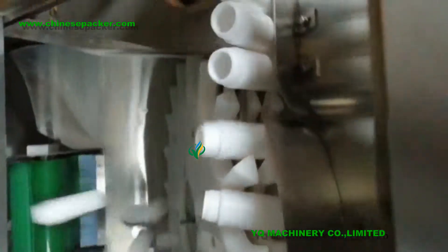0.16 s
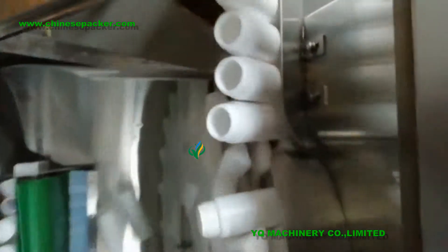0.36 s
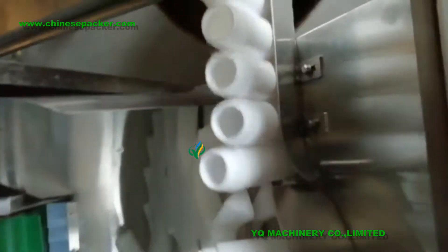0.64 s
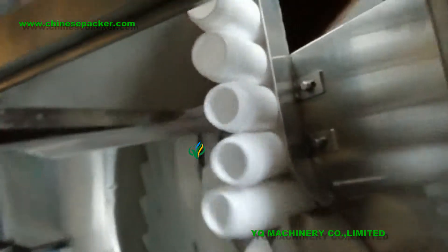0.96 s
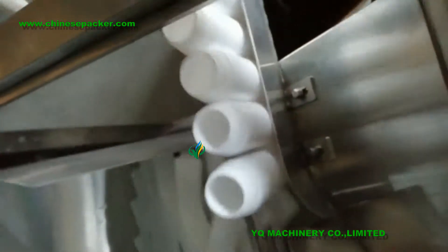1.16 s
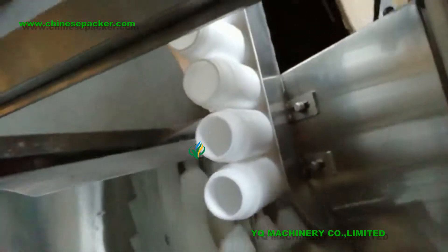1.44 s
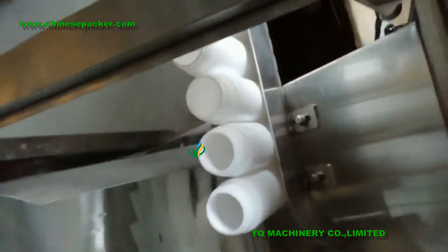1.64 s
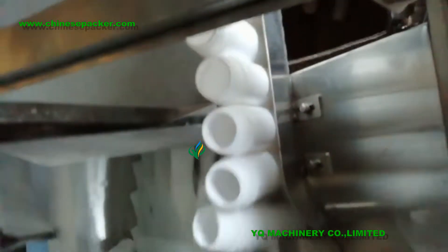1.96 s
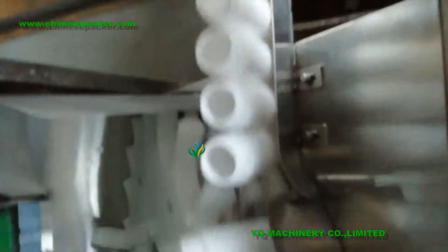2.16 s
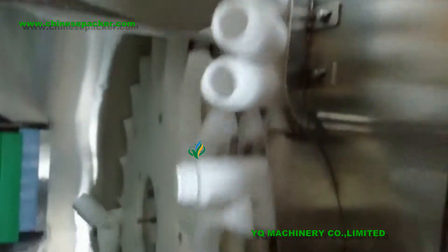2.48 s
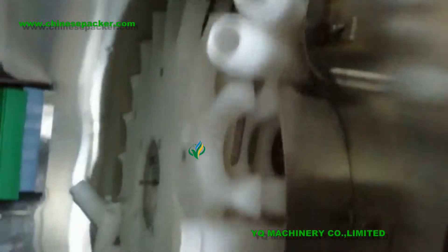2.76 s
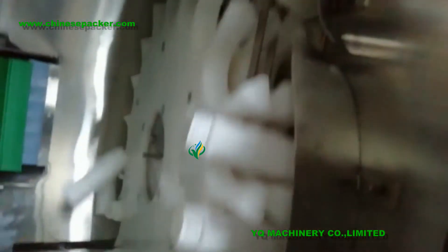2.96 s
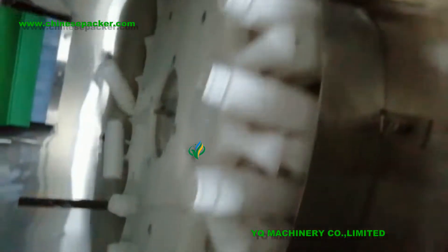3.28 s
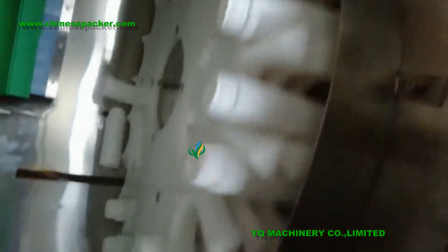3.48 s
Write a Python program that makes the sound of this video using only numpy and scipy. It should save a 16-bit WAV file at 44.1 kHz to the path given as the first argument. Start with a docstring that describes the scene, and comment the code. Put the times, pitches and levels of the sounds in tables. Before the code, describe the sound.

A bottle sorting machine runs continuously: air jets hiss in uneven surges while empty plastic bottles rattle, knock on metal guides and drop with hollow thumps, heard close above the steel bowl in a factory.

```python
"""A rotary bottle sorter runs in a factory, heard from close above its steel bowl.
From the start, air jets hiss and surge as bottles pass the nozzles: filtered noise with quick echoes and chatter.
Empty bottles rattle over the low rumble of the turning bowl: random contacts drive noise bands and resonances.
Soon bottles knock on the guides and drop with hollow thumps: decaying modes, echoed between steel walls.
Later come flat slaps, single swings of pressure, and a low drone that swells briefly, a wavering sine."""
import sys
import numpy as np
from scipy import signal
from scipy.io import wavfile

SR = 44100
rng = np.random.default_rng(int(sys.argv[2]) if len(sys.argv) > 2 else 0)


def generate_wav(sig):
    """Save sig (samples, or channels by samples) to the path in sys.argv[1] as 16-bit PCM at SR."""
    pcm = np.round(np.clip(np.atleast_2d(sig).T, -1, 1) * 32767).astype(np.int16)
    wavfile.write(sys.argv[1], SR, pcm)


N = 159642
T = np.arange(N) / SR  # time, s
BLOW_SAMPLES = SR // 4  # length computed for each blow
SIDES = np.array([[1], [-1]])  # opposite signs for left and right
# stereo balance of noise and thumps: f/Hz, left minus right/dB
BALANCE = [(60, -6), (200, 2.5), (330, -3), (500, 6.5), (770, 10), (1170, 1), (1790, -4), (2740, 0),
           (4200, -2), (7000, -2.5), (8500, -1.5), (10500, 0), (15000, -1)]


def from_db(db):
    """Logarithmic level: decibels to amplitude gain."""
    return 10 ** (np.asarray(db) / 20)


def rms_one(x):
    """Normalisation of power: scale to unit rms."""
    return x / np.sqrt(np.mean(x ** 2) + 1e-20)


def in_time(rows):
    """Linear interpolation: each column of a time table at every sample."""
    s, *columns = np.transpose(rows)
    return [np.interp(T, s, column) for column in columns]


def at_hz(points, hz):
    """Interpolation on a logarithmic frequency axis."""
    table_hz, values = np.transpose(points)
    return np.interp(np.log(hz), np.log(table_hz), values)


def panned(db):
    """Interaural level difference: left and right gains of constant total power."""
    return rms_one(from_db(SIDES / 2 * db))


def drift(rate_hz):
    """Low-pass random process: critically damped filtered noise, of spread 1."""
    step = 40  # computed at every 40th sample
    warm_up = 2000
    pole = np.exp(-2 * np.pi * rate_hz * step / SR)
    noise = rng.standard_normal(N // step + 2 + warm_up)
    slow = signal.lfilter([1], [1, -2 * pole, pole * pole], noise)[warm_up:]
    return np.interp(np.arange(N) / step, np.arange(len(slow)), rms_one(slow))


def add(out, s, sound):
    """Superposition: mix a short stereo sound in at a time."""
    i = int(max(s, 0) * SR)
    out[:, i:i + sound.shape[1]] += sound[:, :max(N - i, 0)]


def coloured(spectrum, drive, patchy_db, flicker_hz):
    """Third-octave noise synthesis: partly coherent stereo bands share a drive but flicker singly; rms 1."""
    # coherence between the ears: f/Hz, left-right likeness (clipped to -1..1)
    likeness = [(60, 1), (200, 0.91), (330, 0.79), (500, -1.04), (770, -0.21), (1170, 0.78), (1790, 0.49),
                (2740, -0.28), (4190, -0.21), (6400, -0.088), (15000, -0.061)]
    out = 0
    edges = 25 * 2 ** (np.arange(29) / 3)
    white = rng.standard_normal((2, 2, N)) * drive  # neighbouring bands use different noise
    for k, (low, high) in enumerate(zip(edges, edges[1:])):
        if high < spectrum[0][0] or low > spectrum[-1][0]:
            continue
        hz = np.sqrt(low * high)
        band = signal.butter(2, [low, high], "band", fs=SR, output="sos")
        mid, side = signal.sosfilt(band, white[k % 2])
        alike = np.clip(at_hz(likeness, hz), -1, 1)
        level_db = at_hz(spectrum, hz) + patchy_db * drift(flicker_hz)
        stereo = np.sqrt(1 + alike) * mid + np.sqrt(1 - alike) * side * SIDES
        out = out + from_db(level_db) * panned(at_hz(BALANCE, hz)) * stereo
    return rms_one(out)


def near_walls(x):
    """Early reflection: steel sheets close to the nozzles return three quick echoes a side; rms 1."""
    echo_gain = 0.27
    out = x.copy()
    for k, lag in enumerate((rng.uniform(.001, .012, 6) * SR).astype(int)):
        out[k % 2, lag:] += echo_gain * x[k % 2, :-lag]
    return rms_one(out)


def chatter():
    """Impulse excitation: random light ticks ring briefly, mostly at a few of 20 high pitches; rms 1."""
    ticks_per_s, spread_db, t60_s = 170, 2.5, 0.031
    sizes = from_db(spread_db * np.minimum(rng.exponential(1, N), 3))
    ticks = (rng.random(N) < ticks_per_s / SR) * sizes
    at = np.flatnonzero(ticks)
    out = np.zeros((2, N))
    for hz in np.geomspace(2900, 6270, 20):
        hits = np.zeros((2, N))
        # the product of two random factors leaves few strong pitches in a tick
        hits[:, at] = ticks[at] * rng.exponential(1, len(at)) * rng.standard_normal((2, len(at)))
        pole = from_db(-60 / (t60_s * SR)) * np.exp(2j * np.pi * hz / SR)
        out += signal.lfilter([1], [1, -pole], hits + 1e-18).imag
    return rms_one(out)


def air_jets():
    """Turbulent jet noise: hiss and lower rush flutter together and sway; bottles chatter in the stream."""
    # jet strength: t/s, relative level of hiss/dB, relative level of rush/dB
    jet_levels = [(0.0, -20, -22.5), (0.08, -17.5, -38), (0.11, -16.5, -20), (0.12, -23, -41),
                  (0.13, -17.5, -27), (0.3, -18, -30.5), (0.31, -15, -17.5), (0.34, -24.5, -28.5),
                  (0.39, -25, -27), (0.42, -27.5, -39), (0.49, -22.5, -30), (0.55, -18, -18.5),
                  (0.57, -18, -30), (0.67, -17, -19), (0.73, -22, -29.5), (0.84, -18.5, -28),
                  (0.9, -19, -20.5), (0.94, -16.5, -27), (1.06, -21.5, -22.5), (1.09, -18, -26.5),
                  (1.19, -19, -22.5), (1.24, -17, -25.5), (1.32, -18, -28.5), (1.35, -16.5, -23),
                  (1.4, -23.5, -20.5), (1.445, -21, -27.5), (1.675, -17, -25), (1.71, -15.5, -18.5),
                  (1.74, -23.5, -25.5), (1.77, -18.5, -26), (2.01, -18.5, -28.5), (2.07, -13.5, -24.5),
                  (2.1, -23.5, -24), (2.15, -19.5, -28.5), (2.25, -18, -27), (2.275, -15, -18.5),
                  (2.33, -17.5, -29.5), (2.38, -17.5, -26.5), (2.405, -12, -24), (2.44, -19.5, -25.5),
                  (2.5, -15, -27.5), (2.56, -17.5, -30), (2.61, -15.5, -23.5), (2.64, -14, -31.5),
                  (2.71, -17.5, -29), (2.77, -13.5, -22.5), (2.8, -23.5, -21.5), (2.84, -16.5, -34.5),
                  (2.9, -17, -28), (2.99, -14.5, -29.5), (3.12, -14.5, -22.5), (3.14, -18.5, -22),
                  (3.24, -17, -29), (3.45, -14.5, -26.5), (3.47, -15.5, -24), (3.54, -21.5, -24.5),
                  (3.62, -16, -26)]
    # noise spectra: f/Hz, relative density/dB per Hz
    hiss_spectrum = [(4000, -1.5), (5500, -2.5), (6800, 1), (8000, 3), (9000, -3.5), (10200, -2),
                     (12500, -10), (15500, -11.5)]
    rush_spectrum = [(900, -7.5), (1800, -0.5), (2600, -1.5), (3700, 0), (5000, -2.5), (6300, -3.5),
                     (8000, -10), (12000, -32.5)]
    hiss_trim_db, rush_trim_db, chatter_db = -5.5, 2, -9.5  # chatter is set against the rush
    hiss_db, rush_db = in_time(jet_levels)
    sway_db = 1.7 * drift(5.1) * SIDES / 2  # left against right
    flutter = from_db(0.49 * drift(32) + 1.0 * drift(250) + sway_db)
    hiss = near_walls(coloured(hiss_spectrum, flutter, patchy_db=1.32, flicker_hz=22))
    rush = near_walls(coloured(rush_spectrum, flutter, patchy_db=3.0, flicker_hz=10))
    rush = rms_one(rush + from_db(chatter_db) * chatter())
    return from_db(hiss_db + hiss_trim_db) * hiss + from_db(rush_db + rush_trim_db) * rush


def dying(contacts, t60_s, wash):
    """Exponential energy decay after each contact, over a steady share of energy; gives an amplitude."""
    decay = from_db(-120 / (t60_s * SR))  # energy, not amplitude: 60 dB in t60
    energy = signal.lfilter([1], [1, -decay], contacts ** 2 + 1e-18)
    return np.sqrt(energy / energy.mean() + wash)


def ringing(resonances, contacts):
    """Forced resonance: every contact excites each resonator with a random strength."""
    out = 0
    for hz, width_hz, db, pan_db, phase in resonances:
        pole = np.exp(np.pi * (2j * hz - width_hz) / SR)
        ring = signal.lfilter([1], [1, -pole], contacts * rng.standard_normal(N) + 1e-18)
        ears = np.real(np.array([ring * np.exp(1j * phase), ring]))
        out = out + from_db(db) * panned(pan_db) * rms_one(ears)
    return out


def tumbling():
    """Random impact excitation: many small contacts drive bottle walls, hollow bodies and bowl."""
    # strength of tumbling: t/s, relative level of clatter/dB, of hollow body/dB, of rumble/dB
    tumble_levels = [(0.0, -31, -38, -35), (0.19, -26, -22.5, -35.5), (0.46, -29.5, -33.5, -37),
                     (0.525, -23, -23.5, -34), (0.56, -31, -37, -41), (0.61, -29.5, -29, -27.5),
                     (0.77, -26, -26, -28.5), (0.84, -25.5, -25.5, -34), (0.885, -22, -28, -35),
                     (0.93, -31, -31.5, -35), (1.1, -30, -34.5, -39), (1.19, -28, -22.5, -31),
                     (1.32, -33, -41, -31.5), (1.39, -30, -24.5, -35), (1.48, -36, -33.5, -35),
                     (1.535, -23, -25, -21.5), (1.56, -30, -34.5, -29), (1.7, -30, -25, -30),
                     (2.24, -25.5, -25.5, -33.5), (2.27, -17, -25.5, -27.5), (2.32, -34, -31, -43),
                     (2.49, -22.5, -30, -32.5), (2.68, -45, -32, -39.5), (2.82, -28.5, -32, -45),
                     (2.92, -28.5, -33.5, -33), (3.28, -38.5, -31.5, -39), (3.31, -22, -24, -34),
                     (3.35, -39, -36, -34), (3.44, -28.5, -30.5, -36.5), (3.56, -40, -39, -43),
                     (3.59, -21.5, -37, -40), (3.62, -31, -23, -25)]
    # noise spectra: f/Hz, relative density/dB per Hz
    clatter_spectrum = [(800, -13), (1150, 1), (1550, 2.5), (2000, 2.5), (2400, -10), (3200, -5),
                        (6000, -44)]
    body_spectrum = [(300, -25), (400, -5), (470, -0.5), (570, -23), (720, -6.5), (1000, -8), (1400, -19)]
    rumble_spectrum = [(30, -25), (55, -11), (80, -11), (105, -5), (130, -1), (175, 1.5), (250, 0),
                       (330, -10), (430, -6), (700, -9.5)]
    # resonances of walls, cavities and bowl:
    # f/Hz, width/Hz, level against the layer's noise/dB, left minus right/dB, phase lead of left/rad
    wall_rings = [(1203, 38, -12.5, 33, 0.2), (1496, 23, -8, 10, 0.23), (1673, 23, -11, -1, 0.49),
                  (2147, 46, -6, -2, 2), (2318, 38, -2.5, -4.5, 2.53), (3700, 250, -16, -12, 0.58)]
    cavity_rings = [(438, 13.5, -9, 0.68, 1.7), (479, 14.5, -4.5, 1.7, 2.47), (576, 38, -6, 2.1, 2.2),
                    (696.3, 21, -9.5, 16, 0.53), (828, 22, -12.5, 4, 0.95), (926, 52, -11, 0.92, 0.5)]
    bowl_rings = [(182, 40, -9, -5, 0), (248.5, 34, -9, -5, 0), (304, 35, -5.5, -9, 0),
                  (354, 33, -5, -15, 0)]
    contacts_per_s, spread_db = 420, 1.5
    clatter_trim_db, body_trim_db, rumble_trim_db = -2.5, -3, -2.5
    clatter_db, body_db, rumble_db = in_time(tumble_levels)
    sizes = from_db(spread_db * np.minimum(rng.exponential(1, N), 4))
    contacts = (rng.random(N) < contacts_per_s / SR) * sizes
    clatter = coloured(clatter_spectrum, dying(contacts, 0.019, wash=0.36), patchy_db=3.0, flicker_hz=33)
    body = coloured(body_spectrum, dying(contacts, 0.0048, wash=1.0), patchy_db=5.5, flicker_hz=12.8)
    rumble = coloured(rumble_spectrum, dying(contacts, 0.046, wash=0.63), patchy_db=0.4, flicker_hz=16.0)
    return (from_db(clatter_db + clatter_trim_db) * (clatter + ringing(wall_rings, contacts))
            + from_db(body_db + body_trim_db) * (body + ringing(cavity_rings, contacts))
            + from_db(rumble_db + rumble_trim_db) * (rumble + ringing(bowl_rings, contacts)))


def struck(modes, hz, t60_s, phase_spread):
    """Modal synthesis: decaying modes, varied at each blow and out of step between the ears; peak 1."""
    t = T[:BLOW_SAMPLES]
    out = 0
    for ratio, db in modes:
        detune, strength, phase = rng.standard_normal(3)
        mode_hz = hz * ratio * (1 + 0.026 * detune)
        angle = 2 * np.pi * (mode_hz * t + rng.random()) + phase_spread * phase * SIDES
        out = out + from_db(db + 1.8 * strength - 60 * t / t60_s) * np.sin(angle)
    return out / np.abs(out).max()


def knocks():
    """Impact of bottle on guide: noise tick, ping of the steel guide and ring of the wall, with one bounce."""
    # knocks: t/s, relative peak level/dB, nominal ring f/Hz, left minus right/dB, relative level of tick/dB
    knock_list = [(0.092, -9, 1560, 4, -8), (0.1082, -11, 1690, -2, -11), (.126, -11.5, 2300, -14, -20),
                  (.178, -17, 1180, -1, -10), (0.2748, -13, 1800, -8, -3), (0.3125, -13.5, 1570, -4, -23),
                  (0.3879, -10.5, 2265, -6, -7), (0.8015, -5, 1560, 0, -12), (0.8592, -9, 2140, -2, -22),
                  (.879, -9, 1390, -2, -19), (0.944, -14, 1660, 8, -26), (1.178, -8, 1830, 7, -16),
                  (1.1996, -8, 1710, 2.5, 0), (1.3454, -12, 1470, 3, -14), (1.3893, -14.5, 1130, 1, -16),
                  (1.4229, -8, 1550, 0, -3), (1.46, -27, 1900, 0, 0), (1.6153, -11, 2040, -1.5, -10),
                  (1.824, -15, 935, 8, -1.5), (1.8331, -12.5, 1150, -1, -22), (1.873, -9, 1680, -6, -11),
                  (1.883, -23, 1650, 2, 0), (1.9505, -11, 1690, 2, 2.5), (2.067, -26, 2080, 0, -12),
                  (2.156, -17, 907, 3, -13), (2.175, -17, 810, 8, -5), (2.227, -18.5, 1700, 3, -2),
                  (2.612, -11, 1480, -7, -2), (2.808, -12, 2020, -9, -18), (2.8499, -18, 1680, 3, -25),
                  (2.9246, -18, 1580, -5, -13), (3.105, -23, 2120, -1, -9), (3.148, -14, 1490, -1, -19),
                  (3.173, -20, 1490, -4, -20), (3.2085, -11, 1534, 3, 0.5), (3.2839, -8.5, 1150, -1, -6),
                  (3.5783, -13, 1700, -8, -8)]
    # modes of a bottle wall: multiple of ring f, relative level/dB
    wall_modes = [(.31, 2), (.62, -10), (.9, -1), (1, 10), (1.1, 8), (1.42, -2), (2.1, -13)]
    ring_trim_db, ring_t60_s, rise_s = -0.5, 0.039, 0.00014
    tick_trim_db, tick_t60_s = -5, 0.011
    guide_hz, guide_trim_db, guide_t60_s = 3615, -15, 0.018
    bounce_s, bounce_db = 0.007, -7  # the delay is scaled at random
    out, t = np.zeros((2, N)), T[:BLOW_SAMPLES]
    rise = 1 - np.exp(-t / rise_s)
    treble = signal.butter(2, 4500, fs=SR, output="sos")  # low-pass on the tick
    for s, db, hz, pan_db, tick_db in knock_list:
        for delay, loss_db in ((0, 0), (bounce_s * rng.uniform(0.496, 1.9), bounce_db)):
            burst = rng.standard_normal((2, len(t))) * from_db(tick_trim_db - 60 * t / tick_t60_s)
            tick = signal.sosfilt(treble, burst)
            ping = from_db(guide_trim_db) * struck([(1, 0)], guide_hz, guide_t60_s, phase_spread=1.0)
            ring = from_db(db + ring_trim_db) * struck(wall_modes, hz, ring_t60_s, phase_spread=0.87)
            blow = (ring + from_db(tick_db) * (tick + ping)) * rise
            add(out, s + delay, blow * from_db(loss_db) * panned(pan_db))
    return out


def enclosure(x):
    """Reverberation between steel walls: six feedback delays a side, without the direct sound."""
    t60_s = 0.34
    out = np.zeros((2, N))
    for k, lag in enumerate((rng.uniform(0.0077, 0.037, 12) * SR).astype(int)):
        direct = x[k % 2]
        loop = direct.copy()
        gain = from_db(-60 * lag / SR / t60_s)
        for i in range(lag, N, lag):
            loop[i:i + lag] += gain * loop[i - lag:i][:N - i]
        out[k % 2] += (loop - direct) * (-1) ** (k // 2)
    return out / np.sqrt(6)


def thumps():
    """Soft impact: falling bottles land with a gradual rise and excite the low modes of the bowl."""
    # drops: t/s, relative peak level/dB, nominal f/Hz, decay time t60/s
    drops = [(0.173, -16, 453, 0.2), (0.605, -13.5, 189, 0.067), (0.642, -12, 172, 0.039),
             (0.719, -19, 328, 0.073), (0.745, -14, 227, 0.039), (1.2, -19, 463, 0.23),
             (1.387, -13, 293, 0.14), (1.5185, -13, 290, 0.03), (1.5355, -5.5, 250, 0.03),
             (1.5455, -7.5, 265, 0.03), (1.569, -13, 325, 0.082), (1.932, -12, 331, 0.077),
             (2.128, -17, 323, 0.066), (2.937, -17, 316, 0.065), (3.146, -15.5, 360, 0.071),
             (3.297, -12, 340, 0.074), (3.316, -13, 218, 0.086), (3.601, -12, 360, 0.098),
             (3.604, -14, 200, 0.088)]
    # modes of the bowl: multiple of nominal f, relative level/dB
    bowl_modes = [(.62, -17.5), (1, 1), (1.33, -7), (2.1, -25)]
    trim_db, rise_s = -2, 0.001
    out = np.zeros((2, N))
    rise = 1 - np.exp(-T[:BLOW_SAMPLES] / rise_s)
    for s, db, hz, t60_s in drops:
        thump = from_db(db + trim_db) * rise * struck(bowl_modes, hz, t60_s, phase_spread=0.37)
        add(out, s, thump * panned(at_hz(BALANCE, hz)))
    return out


def slaps():
    """Pressure pulse: each flat landing pushes out one swing, the derivative of a Gaussian."""
    # flat landings: t/s, peak level/dB, half length of the swing/s
    landings = [(1.5177, -5.5, 0.0003), (1.5376, -15.5, 0.00072), (1.6296, -17.5, 0.00046)]
    out = 0
    for s, db, half_s in landings:
        u = (T - s) / half_s
        out = out + from_db(db) * u * np.exp((1 - u * u) / 2)
    return out


def drone():
    """Frequency modulation: a low sine under the rumble wavers in pitch and level."""
    # swell of the drone: t/s, mean level/dB
    swell = [(1.7, -65), (2.05, -41), (2.28, -37), (2.34, -72), (2.5, -35.5), (2.7, -50.5), (2.95, -45),
             (3.1, -59)]
    centre_hz, wobble_hz = 175.7, 4.94
    level_db, = in_time(swell)
    turns = np.cumsum(centre_hz + wobble_hz * drift(8.2)) / SR
    return from_db(level_db + 2.3 * drift(4.8)) * np.sqrt(2) * np.sin(2 * np.pi * turns)


def scene():
    """Superposition of jets, tumbling, drone and blows; the blows alone reverberate in the machine."""
    room_db = -11
    blows = knocks() + thumps() + slaps()
    return air_jets() + tumbling() + drone() + blows + from_db(room_db) * enclosure(blows)


def record(dry):
    """Port resonance lifts the treble of each microphone; deep bass is cut, peaks clip, the top is cut."""
    # microphone ports, left then right: f/Hz, width/Hz, gain at resonance/dB
    ports = [(8280, 1250, 15), (7910, 1010, 13.5)]
    wet = []
    for x, (hz, width_hz, db) in zip(dry, ports):
        resonance = signal.lfilter(*signal.iirpeak(hz, hz / width_hz, fs=SR), x)
        wet.append(x + (from_db(db) - 1) * resonance)
    wet = signal.sosfilt(signal.butter(1, 70, "high", fs=SR, output="sos"), wet)
    low_pass = signal.ellip(10, .2, 80, 15750, fs=SR, output="sos")
    return signal.sosfilt(low_pass, np.clip(wet, -1, 1))


dry = scene()
out = record(dry)
generate_wav(out)
```